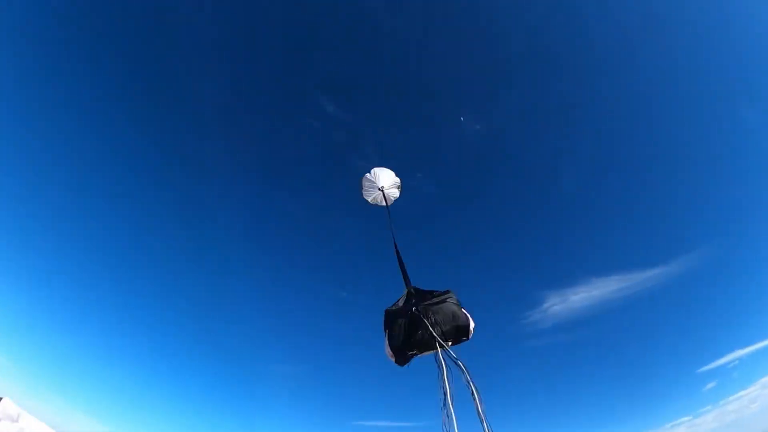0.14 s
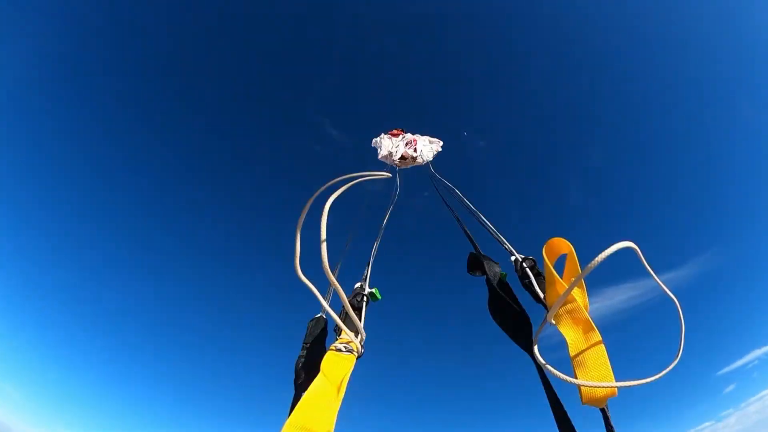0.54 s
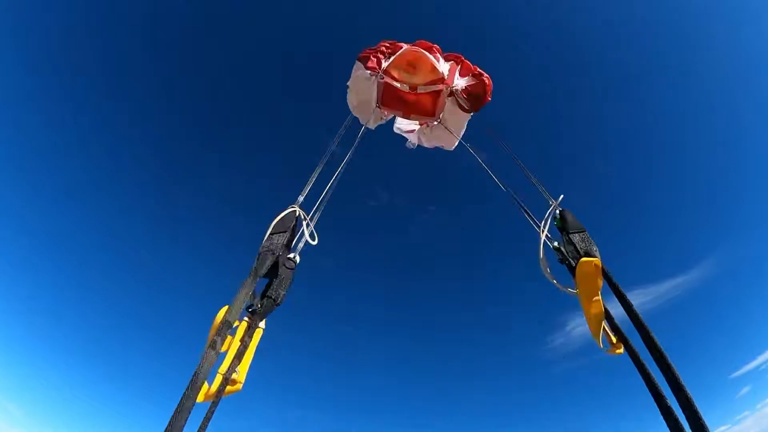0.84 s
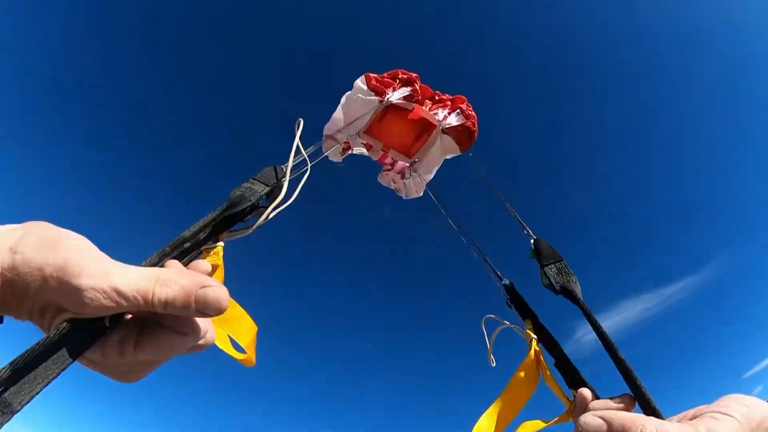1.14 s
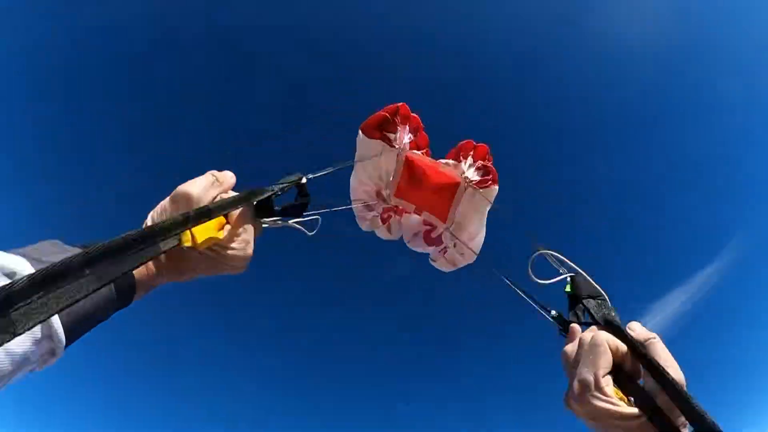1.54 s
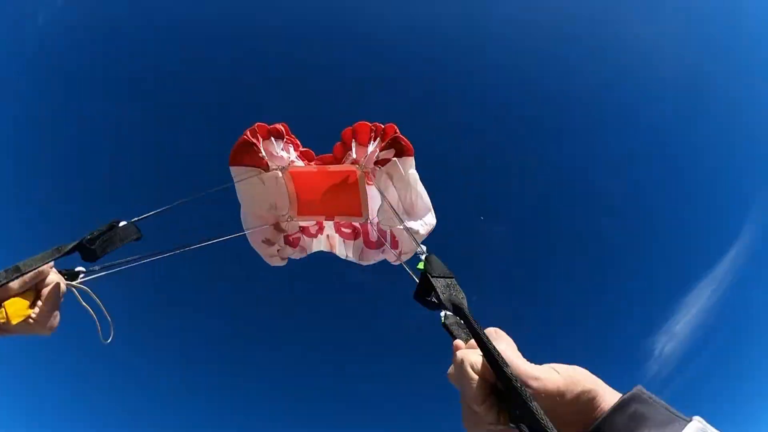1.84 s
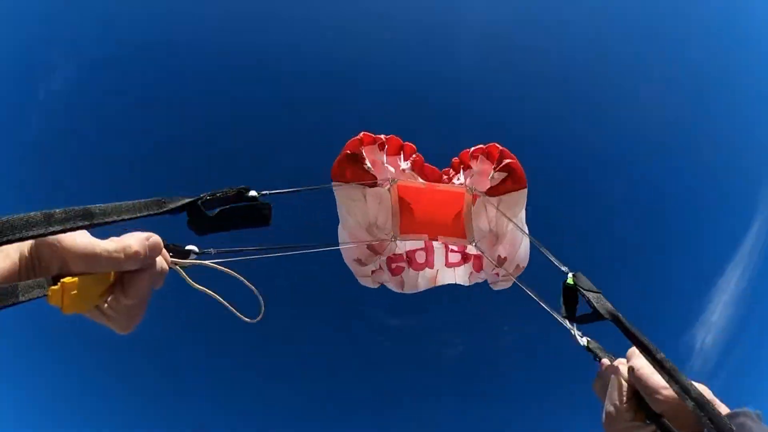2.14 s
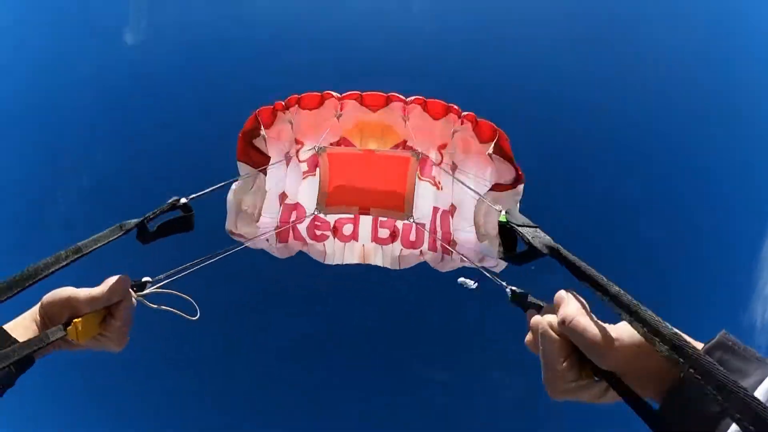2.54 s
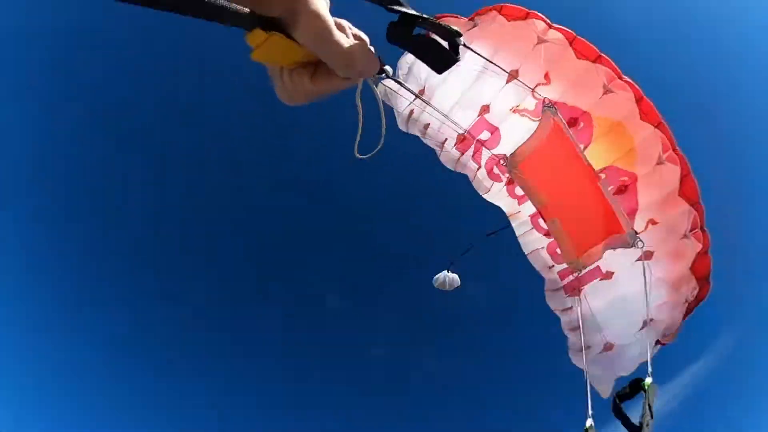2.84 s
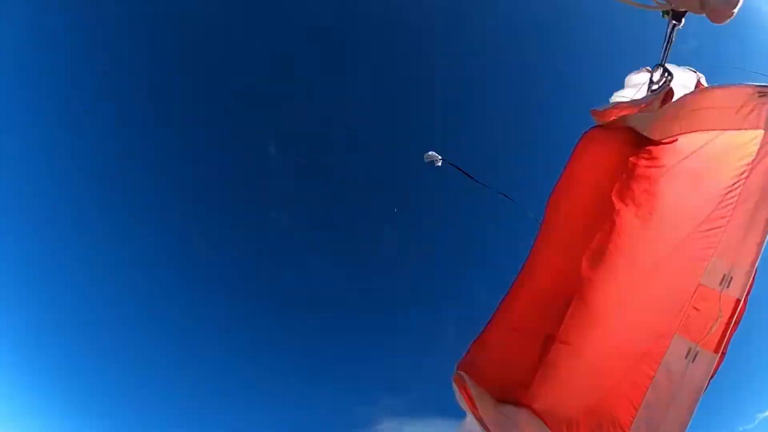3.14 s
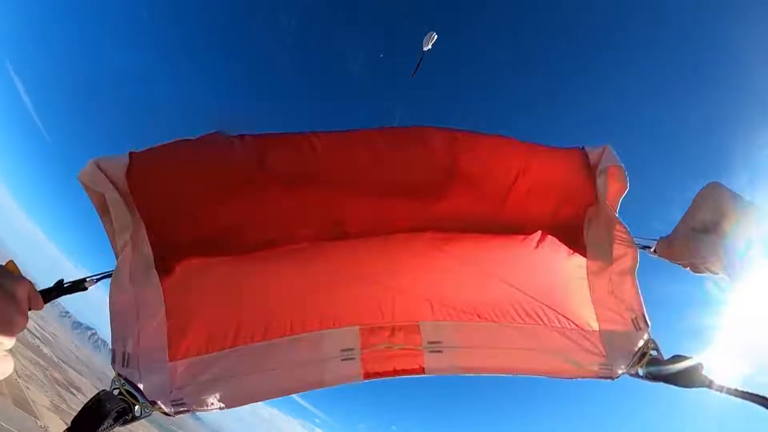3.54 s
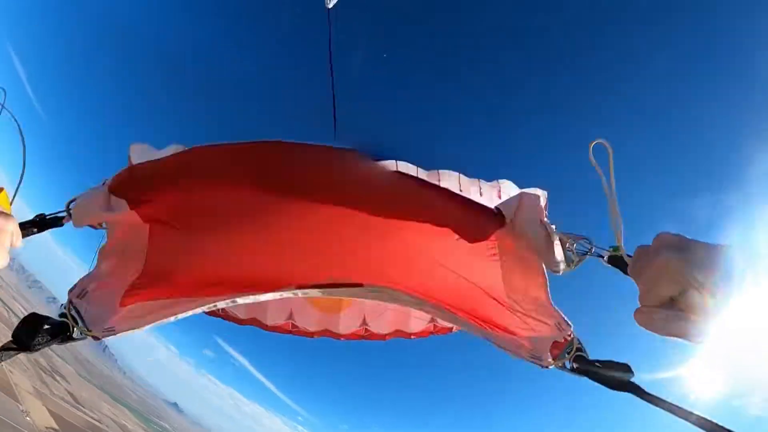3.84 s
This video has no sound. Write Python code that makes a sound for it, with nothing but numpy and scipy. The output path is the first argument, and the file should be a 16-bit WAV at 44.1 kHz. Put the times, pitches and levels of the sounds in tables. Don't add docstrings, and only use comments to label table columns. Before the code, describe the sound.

Wind roar of a skydiving fall, jolted by an opening parachute, then hushing into flapping nylon

```python
import sys
import numpy as np
from scipy import signal
from scipy.io import wavfile
from scipy.ndimage import uniform_filter1d

SR = 44100
rng = np.random.default_rng(int(sys.argv[2]) if len(sys.argv) > 2 else 0)


def how_loud(loudness_db):
    steps = np.asarray(loudness_db, float) / 20
    return 10 ** steps


def store_wav(level_fs):
    pcm = np.round(np.clip(np.atleast_2d(level_fs), -1, 1) * 32767)
    wavfile.write(sys.argv[1], SR, pcm.T.astype(np.int16))


N = 176400

# start_s, pressure_db, fineness_octaves, hiss_db, sheen_over_hiss_db
AIRFLOW = [(0, -15, -0.44, -30.5, 2.5), (.2, -17.5, -0.14, -35, 6.5), (.4, -14.5, -0.54, -38, 9),
           (.44, -17, -0.49, -47, 6), (1.095, -16.5, -0.78, -47, 2.5), (1.12, -10, 0.28, -26.5, -10),
           (1.17, -14.5, 1, -28, -1), (1.23, -14.5, -0.36, -54, -10), (1.33, -12, 0.66, -41, 1),
           (1.66, -14.5, 0.32, -39, -7), (2.09, -15.5, 0.24, -40.5, -4.5), (2.5, -16, -0.22, -46, -2),
           (2.65, -20.5, -0.37, -51, 0.5), (2.71, -31.5, -1.46, -59, 3.5), (3.0, -35.5, -1.42, -57, 3),
           (3.24, -26, -1.4, -41.5, 3.5), (3.6, -21.5, -1.77, -40.5, 2.5), (4, -24.5, -0.77, -37, 5.5)]
# pitch_hz, level_db_per_hz
EDDY_TONE = [(12, -26.5), (26, 0.5), (115, 0), (210, -4), (380, -12.5), (800, -27.5), (1800, -48),
             (9000, -108)]
# pitch_hz, level_db_per_hz
HISS_TONE = [(100, 6.5), (330, 14), (1000, 5.5), (2000, -4.5), (4500, -18.5), (7000, -33.5), (9400, -44),
             (14000, -59.5)]
# pitch_hz, level_db_per_hz
SHEEN_TONE = [(800, -16), (2500, 3.5), (5000, -3), (7200, -13), (9400, -24.5), (14000, -36.5)]
# start_s, level_db, length_s
CANOPY_BUFFETS = [(.12, -34.5, 0.081), (1.187, -19, 0.0038), (1.204, -21, 0.0019), (1.218, -15, 0.0028),
                  (1.247, -15.5, 0.028), (1.272, -16, 0.0037), (1.288, -17, 0.0028), (1.31, -19, 0.012),
                  (1.333, -23, 0.012), (1.362, -17.5, 0.005), (1.377, -22, 0.0021), (1.431, -21.5, 0.0033),
                  (1.443, -14.5, 0.0026), (1.485, -23.5, 0.0088), (1.523, -22.5, 0.0096),
                  (1.573, -19.5, 0.021), (1.616, -23.5, 0.003), (1.642, -20, .008), (1.7, -28, 0.0075),
                  (1.79, -34, 0.018), (1.84, -24.5, 0.018), (1.95, -27.5, 0.0076), (1.985, -28, 0.0049),
                  (2.087, -39.5, 0.03), (2.18, -33, 0.019), (2.3, -39, .008), (2.42, -38, 0.0066),
                  (2.49, -38, .004), (2.527, -47.5, .004), (2.6, -40, 0.009)]
# start_s, level_db, length_s
CELL_CRACKS = [(1.11, -34, 0.002), (1.119, -34, 0.002), (1.1884, -31, 0.0016), (1.197, -37, 0.002),
               (1.2516, -32, 0.002), (1.2704, -30, 0.002), (1.311, -24, 0.002), (1.3164, -33, 0.002),
               (1.3464, -28, 0.002), (1.398, -32, 0.0024), (1.4724, -33, 0.002), (1.5024, -32, 0.002),
               (1.519, -40, 0.002), (1.5364, -35, 0.002), (1.5474, -34, 0.002), (1.5614, -31.5, 0.0022),
               (1.575, -31, 0.0016), (1.5877, -36, 0.002), (1.588, -40, 0.002), (1.6152, -35, 0.002),
               (1.6377, -32, 0.002), (1.6654, -34, 0.002), (1.699, -35, 0.002), (1.712, -33.5, 0.002),
               (1.731, -29.5, 0.002), (1.749, -36, 0.002), (1.7873, -45, 0.002), (1.803, -43, 0.002),
               (1.803, -37, 0.002), (1.8178, -31, 0.0023), (1.834, -34, 0.0022), (1.844, -37, 0.002),
               (1.866, -36, 0.0022), (1.921, -36, 0.002), (1.951, -42, 0.002), (1.9764, -39, 0.002),
               (1.979, -41, 0.002), (1.996, -34.5, 0.002), (2.0298, -47, 0.002), (2.096, -42, 0.002),
               (2.1294, -31.5, 0.0024), (2.1794, -41, 0.002), (2.299, -33, 0.0024), (2.371, -36, 0.002),
               (2.417, -34, 0.0023), (2.488, -42, 0.002), (2.54, -52, 0.002), (2.595, -51, 0.0021),
               (2.645, -51, 0.002), (2.743, -54, 0.002)]
# pitch_hz, level_db_per_hz
CRACK_TONE = [(300, -7), (1200, -2.5), (3000, -0.5), (5500, -8), (7500, -23.5), (10000, -30),
              (14000, -44.5)]
# start_s, rustle_db, length_s, snap_db, push_db
PANEL_FLAPS = [(2.938, -48, 0.0028, -61, -45), (3.027, -42.5, 0.0094, -49, -26.5),
               (3.071, -45, 0.0029, -48, -45), (3.079, -45.5, 0.011, -33, -25.5),
               (3.132, -47, .003, -48, -51), (3.14, -39.5, 0.0051, -46, -43),
               (3.185, -39, 0.0035, -36, -44), (3.21, -35.5, 0.0078, -45, -53),
               (3.22, -27.5, 0.0074, -26, -33), (3.25, -32.5, 0.008, -32, -29),
               (3.276, -39, .003, -42, -45), (3.283, -32.5, 0.0045, -34, -27),
               (3.292, -35.5, 0.01, -40, -25), (3.305, -37, 0.0033, -40, -45),
               (3.332, -28.5, 0.0053, -49, -45), (3.364, -45.5, 0.012, -29, -29),
               (3.381, -36, 0.0042, -45, -43), (3.396, -34, 0.0091, -47, -54.5),
               (3.428, -33.5, 0.015, -37, -19), (3.445, -32.5, 0.0073, -45, -39),
               (3.488, -30, 0.018, -33, -23.5), (3.501, -48, 0.0089, -38, -44),
               (3.578, -35, 0.0026, -27, -45), (3.588, -31, 0.0027, -20, -65),
               (3.601, -25, 0.013, -9.5, -37), (3.672, -33, 0.0065, -32, -45),
               (3.689, -40, 0.031, -41, -43), (3.725, -21, 0.011, -2.5, -13),
               (3.775, -32.5, 0.0067, -32, -29), (3.799, -46, 0.0037, -32, -31),
               (3.829, -42, 0.0016, -41, -40), (3.834, -17, 0.0017, -41, -41),
               (3.853, -34, 0.0054, -28, -40), (3.869, -21, 0.0086, -9, -15),
               (3.879, -31, 0.0058, -32, -31), (3.924, -26, 0.0053, -39, -46),
               (3.931, -29, 0.011, -19, -15), (3.941, -40, .006, -21, -35),
               (3.977, -32, 0.011, -15.5, -27.5)]
# pitch_hz, level_db_per_hz
NYLON_TONE = [(120, -2.5), (260, -5), (700, -8), (1000, -17), (2200, -17.5), (4300, -27), (7200, -41),
              (13000, -72.5)]

PATCH_DB, SWELL_DB, LEVELLING = 1, 0.5, 0.43
HOUSING_HZ, HOUSING_OCTAVES, HOUSING_DB = 108, 0.91, 2
FLICKER_DB, GRIT_DB = 0.5, 3
RIDE = 0.23
SHEEN_DB, BUFFET_DB = -16, -11.5
CRACKLE_DB, CRACKLE_S, OPEN_S, FULL_S = 2, 0.0013, 0.9, 2.9
CELLS_DB = -8
RISE_SHARE = 0.38
CRINKLE_PER_S, CRINKLE_DB, BIGGEST_CRINKLE = 1500, 5, 2.6
CREASE_DB = 2
SNAP_HZ, SNAP_S = 1790, 0.00014
SLAP_HZ, SLAP_S, SLAP_DB = 580, 0.0028, -11
PUSH_S, PUSH_EDGE_S = 0.014, 0.00075
MIC_HZ, CEILING = 11600, 0.95


def evened(x):
    return x / np.sqrt(np.mean(x ** 2) + 1e-20)


def read(points, hz):
    f, value = np.transpose(points)
    return np.interp(np.log(hz + 1), np.log(f + 1), value)


def air(column, t):
    table = np.array(AIRFLOW)
    return np.interp(t, table[:, 0], table[:, column])


def smooth(x, size, axis=-1):
    return uniform_filter1d(uniform_filter1d(x, size, axis=axis), size, axis=axis)


def wander(seconds):
    width = max(int(seconds * SR), 2)
    return evened(smooth(rng.standard_normal(N), width))


def colour(x, points):
    level_db = read(points, np.abs(np.fft.fftfreq(8192, 1 / SR)))
    log_gain = np.log(how_loud(np.maximum(level_db, -110)))
    phase = -np.imag(signal.hilbert(log_gain))
    taps = np.fft.ifft(np.exp(log_gain + 1j * phase)).real[:4096]
    return signal.oaconvolve(x, taps / np.linalg.norm(taps))[:len(x)]


def swellings(rows):
    t, out = np.arange(N) / SR, np.zeros(N)
    for start, level_db, length in rows:
        u = (t - start) / max(length, 0.001)
        out += how_loud(level_db) * np.exp(np.where(u < 0, u / RISE_SHARE, -u))
    return out


def eddies():
    frames, hz = N // 512 + 5, np.fft.rfftfreq(2048, 1 / SR)[:, None]
    real, imaginary, patches = rng.standard_normal((frames, 1025, 3)).T
    patches = uniform_filter1d(patches, 6, axis=0)
    patches = evened(uniform_filter1d(patches, 4, axis=1))
    fineness = air(2, np.arange(frames) * 512 / SR)
    shape = how_loud(read(EDDY_TONE, hz / 2 ** fineness))
    octaves_away = np.log2((hz + 1) / HOUSING_HZ)
    shape *= how_loud(HOUSING_DB * np.exp(-(octaves_away / HOUSING_OCTAVES) ** 2))
    shape /= np.linalg.norm(shape, axis=0)
    spectrum = (real + 1j * imaginary) * shape * how_loud(PATCH_DB * patches)
    roar = evened(signal.istft(spectrum, nperseg=2048, noverlap=1536)[1][:N])
    power = smooth(roar ** 2, 900) + 0.05
    roar = evened(roar / power ** (LEVELLING / 2))
    return roar * how_loud(air(1, np.arange(N) / SR) + SWELL_DB * wander(0.025))


def hiss(roar):
    t = np.arange(N) / SR
    crest = uniform_filter1d(abs(roar), 60) / (uniform_filter1d(abs(roar), 3000) + 1e-9)
    grit = rng.standard_normal(N) * how_loud(GRIT_DB * wander(0.00053))
    grit *= 1 - RIDE + RIDE * crest
    level = how_loud(air(3, t) + FLICKER_DB * wander(0.0072))
    level += how_loud(BUFFET_DB) * swellings(CANOPY_BUFFETS)
    filling = (t > OPEN_S) * (t < FULL_S)
    crackle_db = CRACKLE_DB * filling * wander(CRACKLE_S)
    sheen = rng.standard_normal(N) * level * how_loud(SHEEN_DB + air(4, t) + crackle_db)
    return colour(evened(grit) * level, HISS_TONE) * how_loud(5.5) + colour(sheen, SHEEN_TONE)


def cells():
    return colour(rng.standard_normal(N) * swellings(CELL_CRACKS), CRACK_TONE) * how_loud(CELLS_DB)


def creased(x):
    z = signal.stft(x, nperseg=256)[2]
    patches = rng.standard_normal(z.shape[::-1]).T
    patches = uniform_filter1d(uniform_filter1d(patches, 5, axis=0), 5, axis=1)
    return evened(signal.istft(z * how_loud(CREASE_DB * evened(patches)), nperseg=256)[1][:N])


def rustle():
    size = how_loud(CRINKLE_DB * np.minimum(rng.exponential(1, N), BIGGEST_CRINKLE))
    happens = rng.random(N) < CRINKLE_PER_S / SR
    cracks = rng.standard_normal(N) * (0.5 + size * happens)
    bursts = swellings([row[:3] for row in PANEL_FLAPS])
    return colour(creased(cracks) * bursts, NYLON_TONE) * how_loud(6.5)


def panel():
    out = rustle()
    t = np.arange(-2000, 2000) / SR
    chances = rng.random((len(PANEL_FLAPS), 2))
    for (start, _, _, snap_db, push_db), (pitch, hollow) in zip(PANEL_FLAPS, chances):
        snap_hz, slap_hz = SNAP_HZ * (0.7 + 0.6 * pitch), SLAP_HZ * (0.92 + 0.64 * hollow)
        snap = np.cos(2 * np.pi * snap_hz * t) * np.exp(-(t / SNAP_S) ** 2)
        slap = np.cos(2 * np.pi * slap_hz * t) * np.exp(np.where(t < 0, 4 * t, -t) / SLAP_S)
        push = -np.tanh((t - 0.003) / PUSH_EDGE_S) * np.exp(-(t / PUSH_S) ** 2 / 2)
        flap = how_loud(snap_db) * (snap + how_loud(SLAP_DB) * slap) + how_loud(push_db) * push
        part = out[round(start * SR) - 2000:][:len(t)]
        part += flap[:len(part)]
    return out


def scene():
    roar = eddies()
    return (roar + hiss(roar) + cells() + panel())[None]


def roll_off(x):
    return signal.sosfilt(signal.butter(12, 13740, fs=SR, output="sos"), x)


def record(dry):
    overloaded = CEILING * np.tanh(1.157 * dry / CEILING)
    muffled = signal.sosfilt(signal.butter(2, MIC_HZ, fs=SR, output="sos"), overloaded)
    return roll_off(muffled)


dry = scene()
out = record(dry)
store_wav(out)
```